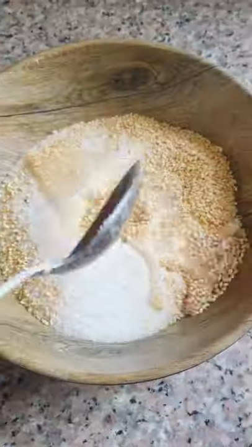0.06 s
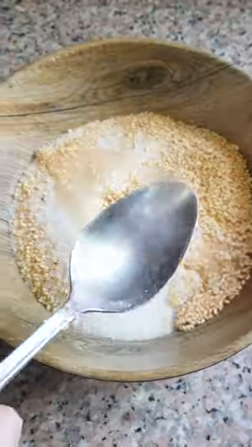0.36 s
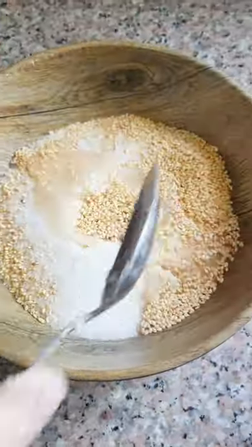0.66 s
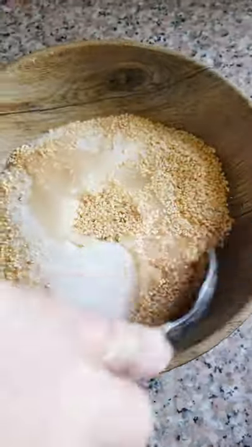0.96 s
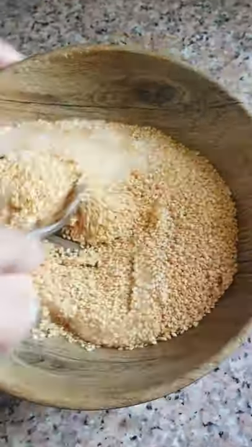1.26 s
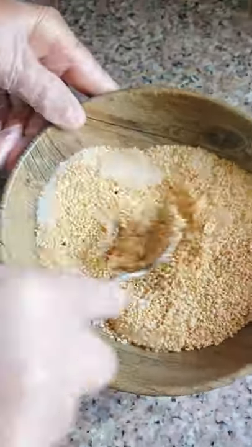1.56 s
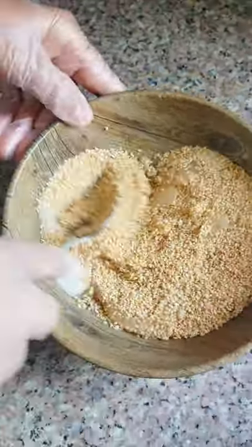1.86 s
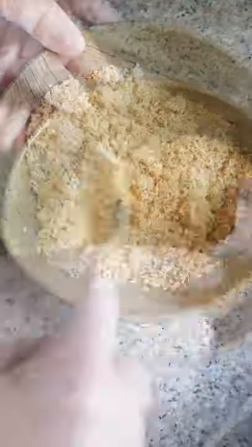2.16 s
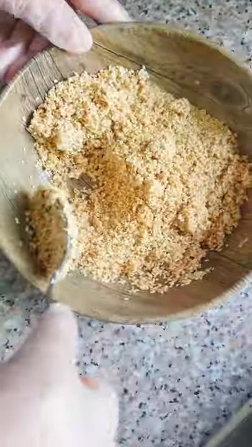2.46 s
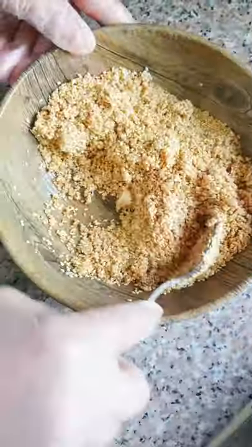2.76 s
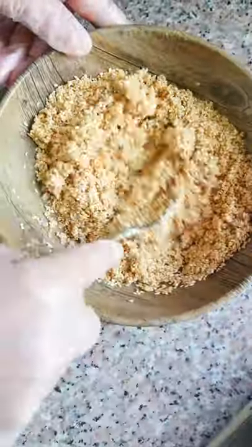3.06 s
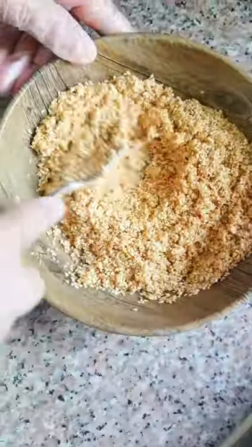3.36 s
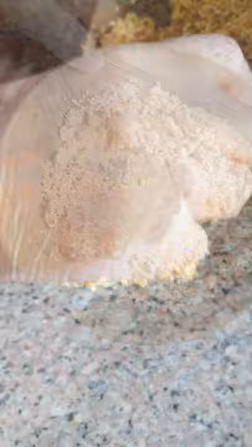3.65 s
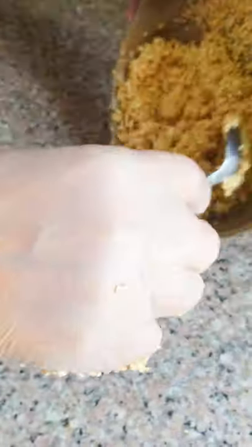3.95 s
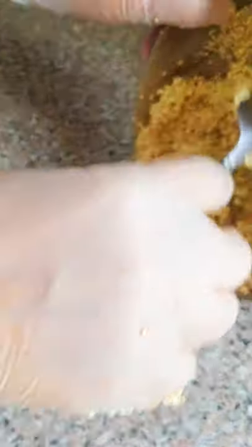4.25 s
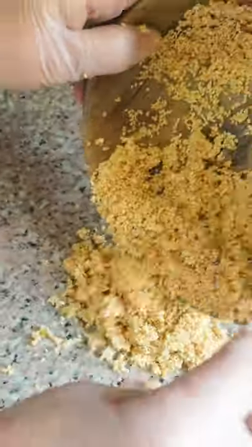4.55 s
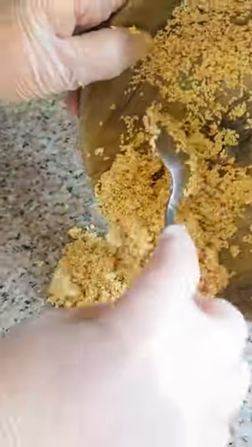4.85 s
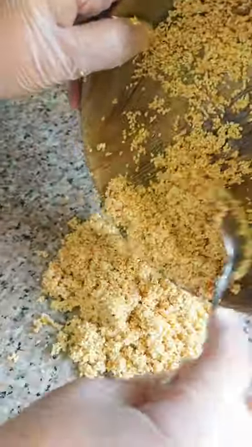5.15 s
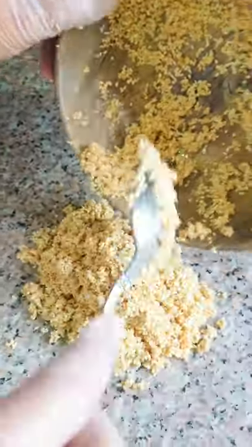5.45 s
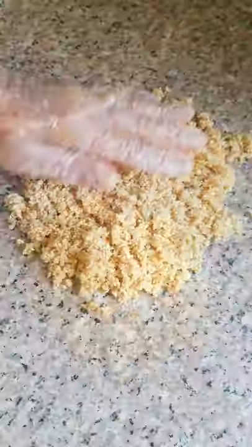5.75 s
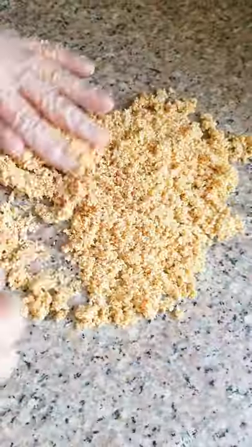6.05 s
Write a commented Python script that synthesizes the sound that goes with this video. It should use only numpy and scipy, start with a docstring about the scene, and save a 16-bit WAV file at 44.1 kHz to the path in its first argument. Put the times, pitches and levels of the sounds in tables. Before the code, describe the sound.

Moist sesame seeds rustle and crunch as a spoon mixes them and scrapes them out of a wooden bowl, clicking against it.

```python
"""Stirring sesame seeds in a wooden bowl

A metal spoon stirs moist seeds, then scrapes them out onto a stone countertop. Impacts and short,
gritty strokes of friction excite the modes of bowl and spoon; stick-slip oscillation adds squeaks.
The seeds, pushed and at last patted by hand, rustle through countless small collisions.
The small kitchen reverberates and hums faintly."""
import sys
import numpy as np
from scipy import signal
from scipy.fft import rfft, irfft
from scipy.io import wavfile
from scipy.ndimage import uniform_filter1d, map_coordinates

SR = 44100
rng = np.random.default_rng(int(sys.argv[2]) if len(sys.argv) > 2 else 0)


def master_out(mix):
    """Clip the mix to full scale and print it as 16-bit PCM to the path in sys.argv[1]."""
    frames = np.transpose(np.atleast_2d(mix))
    ceiling = np.clip(frames, -1, 1)
    pcm = np.round(ceiling * 32767).astype(np.int16)
    wavfile.write(sys.argv[1], SR, pcm)


N = 269010
TIME = np.arange(N) / SR

# noise spectra of room, rumble and seeds: (frequency [Hz], relative density [dB])
AIR_SPECTRUM = [(15, -54), (25, -10), (61, -7.5), (102, -7.5), (242, -22), (451, -12), (624, -20.5),
                (754, -20), (1400, -30.5), (2000, -32), (2410, -45), (2990, -41.5), (6920, -50),
                (14400, -42), (16000, -58)]
RUMBLE_SPECTRUM = [(60, -15.5), (120, 7), (200, 2.5), (400, -4), (700, -9), (1400, -30.5)]
RUSTLE_SPECTRUM = [(350, -26.5), (650, -4.5), (1100, -9), (1700, -5), (2200, -7.5), (3000, -5.5),
                   (4400, -2), (7000, -3.5), (12000, -5.5), (15000, -4.5), (16000, -7.5)]
# reverberation of the kitchen: (frequency [Hz], T60 [s], level [dB])
REVERB_BANDS = [(265, 0.22, 1), (1000, 0.34, -14), (2770, 0.28, -7), (6000, 0.21, -14), (14000, 0.094, -22)]
# reflections from bowl and counter: (nominal left delay [s], nominal right delay [s], level [dB])
REFLECTIONS = [(.00062, 0.00087, -8.5), (.00143, 0.0017, -2), (.0026, 0.0028, -3.5), (.0049, 0.0037, -10)]

# heaps of seeds pushed: (crest time [s], build-up [s], spill [s], level [dB], left minus right [dB])
PUSHES = [(.055, 0.048, .04, -61.5, 3.5), (.52, 0.052, 0.034, -55, 1), (0.715, 0.015, 0.028, -50.5, 1),
          (.88, .12, .08, -79, -2), (1.005, .012, .025, -58, 2.5), (1.16, 0.1, 0.037, -47, 3),
          (1.28, 0.11, 0.23, -43.5, 3.5), (1.59, 0.39, 0.036, -43, 4.5), (1.8, 0.036, .02, -41.5, 0.5),
          (1.98, 0.059, 0.035, -45.5, 2), (2.17, 0.066, 0.037, -48.5, 1.5), (2.39, 0.073, 0.055, -47.5, 1),
          (2.55, 0.033, 0.055, -56, 2.5), (2.651, 0.048, 0.024, -46.5, 4.5), (2.82, 0.027, 0.06, -60, 3),
          (2.94, .05, 0.065, -56, 4.5), (3.145, 0.042, 0.012, -45.5, 3), (3.333, 0.038, 0.014, -42.5, 2.5),
          (3.514, 0.04, 0.0097, -44.5, 2), (3.666, 0.027, .05, -50, 3.5), (3.972, 0.26, 0.071, -52, 3),
          (4.22, 0.044, 0.048, -45.5, 1.5), (4.52, 0.094, 0.026, -48, 4), (4.61, 0.024, 0.031, -61, 1.5),
          (4.815, 0.069, .015, -49, 3.5), (4.89, .04, 0.027, -64.5, -1), (5.05, 0.058, .018, -55.5, 1.5),
          (5.38, 0.23, .04, -58, 4), (5.761, .1, .05, -70.5, -1), (6.06, 0.082, 0.057, -60, -1)]
# stray seeds landing: (time [s], level [dB])
SEED_DROPS = [(0.286, -51), (4.401, -24), (4.980, -33), (5.623, -43.5), (5.945, -34.5)]

# modes: (frequency [Hz], nominal bandwidth [Hz], relative level [dB], left minus right [dB])
BODY_MODES = [(340, 160, -1, -2), (520, 260, 0, -1)]  # the bowl as a whole
STANDING_WALL_MODES = [(580, 81, 10, 1), (763, 240, 4.5, 0.91), (946, 190, 9, 9.1), (1190, 320, -7.5, 1.7)]  # its wall, standing on the counter
TILTED_WALL_MODES = [(588, 114, 2.5, 0), (910, 180, -1, -1.5), (1033, 150, -4, -2), (1273, 360, -7, 0.81)]  # its wall, held up
RIM_MODES = [(569, 130, 9.5, -2), (740, 160, -5, -6.5), (946, 420, 1, 4.5), (1375, 350, 5, -0.5)]  # struck clear of the seeds
STIRRING_SPOON_MODES = [(1843, 190, 2.5, 9), (2570, 530, 3, -3), (3010, 55, -3.5, -2), (3750, 470, -2, 13),
                        (5600, 140, -6.5, 16.5), (6300, 130, -9.5, 5.5)]
SCOOPING_SPOON_MODES = [(1440, 110, 6.5, -0.5), (1682, 410, 5.5, 2.5), (2412, 280, 6.5, -3.5),
                        (2817, 540, -12, -5.5), (4090, 270, 8, 0), (5190, 160, -31.5, 0)]
GRIT_MODES = [(5616, 2400, 9, 0.42), (6600, 600, 0, 0.14), (8100, 970, 4.5, 0), (11000, 9000, 2, 0.041),
              (14500, 10000, -11.5, 0.59)]  # seeds crushed under the edge

# squeaks of the spoon's edge: (start [s], duration [s], first pitch [Hz], last pitch [Hz],
# relative level [dB], second harmonic re fundamental [dB], pitch spread [fraction])
SQUEAKS = [(1.076, 0.024, 1265, 1377, -22.5, -30, 0.033), (1.113, 0.035, 4040, 4300, -28.5, -33, 0.06),
           (1.288, 0.036, 2420, 2454, -31, -28.5, 0.058), (1.309, 0.0073, 2726, 2300, -20, -33, 0.0075),
           (1.336, 0.021, 2870, 2600, -43, -9, 0.058), (1.516, 0.026, 2730, 3170, -28.5, 2.5, 0.11),
           (1.924, 0.035, 1008, 1218, -29, -19.5, 0.18), (2.117, 0.04, 2280, 3060, -39.5, -6.5, 0.045),
           (2.89, 0.04, 2525, 2943, -44, -2.5, 0.068), (3.715, 0.066, 1770, 1703, -49.5, -19.5, 0.018),
           (3.866, 0.025, 1033, 990, -36.5, -27.5, 0.022), (3.951, 0.041, 988, 900, -45.5, -26, 0.031),
           (4.166, 0.021, 1495, 2127, -28, -12.5, 0.028), (5.272, 0.069, 5220, 5550, -41.5, -15, 0.1176)]
# strokes of the spoon, with relative levels at peak pressure:
# (start [s], pressing [s], easing [s], pressure swell [dB], wood [dB], spoon [dB], grit [dB])
DRAGS = [(1.036, 0.031, 0.054, 4.5, -41, -34.5, -30.5), (1.123, .006, 0.036, 2, -38.5, -28.5, -33),
         (1.285, 0.058, 0.012, 13, -41, -24, -27), (1.458, 0.0075, .04, 10, -38, -30, -61),
         (1.503, 0.019, 0.027, 11.5, -47, -26, -28.5), (1.548, 0.011, .035, 2.5, -40, -44, -58),
         (1.737, 0.0058, 0.019, -1.5, -38.5, -56, -28), (1.922, 0.0078, 0.023, -4.5, -36.5, -55, -32.5),
         (1.968, 0.028, 0.011, 14, -52, -39.5, -36), (2.118, 0.012, 0.025, 7, -43.5, -42, -35.5),
         (2.315, 0.01, 0.074, 3.5, -35, -32.5, -28.5), (2.643, 0.0048, 0.016, 5, -58, -40.5, -38.5),
         (2.868, 0.045, 0.0096, 18, -46.5, -32.5, -30.5), (3.724, 0.091, 0.039, 20, -39, -35.5, -47),
         (3.862, 0.044, 0.049, 4.5, -42, -35, -41), (3.955, 0.023, 0.02, 9.5, -47.5, -49, -42),
         (4.121, 0.013, 0.021, 13.5, -39, -34, -42), (4.151, 0.04, 0.015, 12.5, -44.5, -28, -34.5),
         (4.446, 0.018, 0.04, 7.5, -30.5, -36.5, -30), (5.215, .1, 0.068, 19, -49, -42.5, -30),
         (5.385, .012, 0.011, 9, -51.5, -41.5, -34.5)]
# impacts of spoon on bowl, with relative levels:
# (time [s], crunch decay [s], body [dB], wood [dB], spoon [dB], grit [dB])
KNOCKS = [(0.437, 0.013, -41, -29.5, -34.5, -43.5), (0.475, 0.015, -43.5, -31.5, -40.5, -59),
          (0.616, 0.025, -48.5, -48, -57, -65), (1.063, 0.0033, -52, -44, -39, -31),
          (1.271, 0.0037, -42, -27.5, -23, -34.5), (1.32, 0.0026, -41, -40, -28, -40.5),
          (1.454, 0.0026, -48.5, -34.5, -27, -48.5), (1.472, 0.0027, -48, -34, -30.5, -48.5),
          (1.493, 0.0009, -42, -27, -33.5, -45.5), (1.739, 0.0048, -52, -38.5, -43.5, -28.5),
          (1.926, 0.018, -62, -39, -43, -33), (2.1, 0.0099, -53, -42, -68, -38.5),
          (2.528, 0.016, -46.5, -50.5, -59, -48.5), (2.875, 0.011, -53.5, -35.5, -38.5, -55),
          (3.626, 0.0065, -38.5, -45, -53, -49.5), (3.861, 0.0017, -46, -48, -44, -47.5),
          (4.126, 0.0042, -38.5, -24.5, -16, -31), (4.413, 0.0019, -34, -24, -36.5, -38.5),
          (4.454, 0.0013, -34, -47.5, -48, -36.5), (4.471, 0.0017, -31.5, -28, -38, -59),
          (4.678, 0.014, -52, -55, -57.5, -55.5), (4.777, 0.006, -49.5, -40.5, -45, -42.5),
          (4.959, 0.0049, -43.5, -49.5, -55, -47.5), (5.191, 0.0046, -49.5, -49, -33, -38.5),
          (5.357, 0.0093, -54, -69, -40.5, -30)]


def from_db(db):
    """Amplitude grows tenfold for every 20 dB."""
    return 10 ** (np.asarray(db) / 20)


def unit_rms(x):
    """Normalisation to unit mean power."""
    return x / np.sqrt(np.mean(x ** 2) + 1e-20)


def at_hz(points, hz, column=1):
    """Interpolation of a spectrum on a logarithmic frequency axis."""
    points = np.array(points)
    return np.interp(np.log(hz + 1e-9), np.log(points[:, 0]), points[:, column])


def drift(knots_per_s):
    """Smooth random modulation with a spread near 1."""
    knots = rng.standard_normal(N // 8)
    return map_coordinates(knots, [TIME * knots_per_s], order=2, mode="wrap")


def coloured(x, spectrum):
    """Spectral shaping of noise, at unit rms."""
    gain = from_db(at_hz(spectrum, np.fft.rfftfreq(N, 1 / SR)))
    return unit_rms(irfft(rfft(x) * gain, N))


def stereo_noise(correlation, length=N):
    """Partial coherence: the sum and difference of two independent noises feed left and right."""
    mid, side = rng.standard_normal((2, length))
    side = side * np.array([[1], [-1]])
    return (np.sqrt(1 + correlation) * mid + np.sqrt(1 - correlation) * side) / np.sqrt(2)


def grains(per_s, spread_db, correlation):
    """Shot noise: a Poisson train of clicks of uneven size, at unit rms."""
    occurs = rng.random(N) < per_s / SR
    sizes = from_db(spread_db * np.minimum(rng.exponential(1, N), 4))
    return unit_rms(stereo_noise(correlation) * occurs * sizes)


def resonate(drive, modes, max_q=20):
    """Modal superposition at unit mean power gain; damping by moist seeds and fingers limits the Q."""
    impulse, response = np.eye(1, 2048)[0], 0
    for hz, width_hz, level_db, pan_db in modes:
        radius = np.exp(-np.pi * max(width_hz, hz / max_q) / SR)
        poles = [1, -2 * radius * np.cos(2 * np.pi * hz / SR), radius ** 2]
        gains = from_db(level_db + np.array([[.5], [-.5]]) * pan_db)
        response = response + gains * (1 - radius ** 2) * signal.lfilter([1, 0, -1], poles, impulse)
    edges_hz = [modes[0][0] * .7, min(modes[-1][0] * 1.4, SR * .45)]
    response = signal.sosfilt(signal.butter(2, edges_hz, "band", fs=SR, output="sos"), response)
    return signal.oaconvolve(drive, np.sqrt(2) * response / np.linalg.norm(response), axes=1)[:, :N]


def late_right(pair, lag_s):
    """A path difference delays the right channel."""
    return np.array([pair[0], np.roll(pair[1], round(lag_s * SR))])


def background(flow):
    """Incoherent sources add in power: room noise, rumble of room and handled bowl, an appliance's hum."""
    air = from_db(-64) * coloured(stereo_noise(correlation=0.33), AIR_SPECTRUM)
    effort = np.abs(uniform_filter1d(flow, int(.25 * SR)))
    handling = from_db(-59.5) * (effort / effort.max()) ** 0.38
    rumble_level = np.hypot(from_db(-68.5), handling)
    rumble = rumble_level * coloured(stereo_noise(correlation=1.0), RUMBLE_SPECTRUM)
    motor_phase = 2 * np.pi * 90.8 * TIME + 0.66 * drift(32)
    motor = unit_rms(np.sin(motor_phase) * from_db(1.8 * drift(12)))
    return air + rumble + from_db(-66.5) * motor


def kitchen_reverb(sound):
    """The diffuse field between hard walls decays exponentially, soonest in the high treble."""
    t, response = TIME[:SR // 2], 0
    onset = 1 - np.exp(-t / 0.00043)
    for low_hz in 125 * 2. ** np.arange(8):
        centre_hz = low_hz * np.sqrt(2)
        decay = from_db(-60 * t / at_hz(REVERB_BANDS, centre_hz))
        tail = rng.standard_normal((2, len(t))) * decay * onset
        tail *= from_db(at_hz(REVERB_BANDS, centre_hz, column=2)) / np.linalg.norm(tail[0])
        octave = signal.butter(2, [low_hz, min(2 * low_hz, SR * .45)], "band", fs=SR, output="sos")
        response = response + signal.sosfilt(octave, tail)
    return signal.oaconvolve(sound, response, axes=1)[:, :N]


def close_reflections(pair, path_sway=.3):
    """Comb filtering: direct sound interferes with reflections whose paths vary as spoon and bowl move."""
    total, power = pair, 1
    for *delays_s, level_db in REFLECTIONS:
        stretch = np.exp(path_sway * drift(1.5))
        echo = [np.interp(TIME - delay * stretch, TIME, side) for delay, side in zip(delays_s, pair)]
        total = total + from_db(level_db) * np.array(echo)
        power += from_db(level_db) ** 2
    return total / np.sqrt(power)


def at_contact(pair):
    """Time and level differences locate the contact with the seeds, which moves from push to push."""
    crest_s, *_, pans_db = np.transpose(PUSHES)
    pan_db = np.interp(TIME, crest_s, pans_db)
    return late_right(pair, lag_s=.00042) * from_db([pan_db / 2, -pan_db / 2])


def seed_flow(trickle_db=-29, trickle_s=.1):
    """Envelope of granular flow: heaps gather, spill and trickle to rest, adding in power."""
    t, power = TIME[::20], 0
    for crest, build_s, spill_s, level_db, _ in PUSHES:
        from_crest = np.maximum((crest - t) / build_s, (t - crest) / spill_s)
        heap = np.exp(-from_crest ** 1.4)  # between a cusp and a bell
        trickle = from_db(trickle_db) * (t > crest) * np.exp(-np.abs(t - crest) / trickle_s)
        power = power + (from_db(level_db) * (heap + trickle)) ** 2
    return np.interp(TIME, t, np.sqrt(power))


def seed_rustle(flow, dry_until_s=1.025, dry_db_per_octave=5.5):
    """Collisions of seeds merge into noise, brighter at first while only dry grains move."""
    ticks = grains(per_s=14000, spread_db=3.0, correlation=0.69)
    dry_spectrum = [(hz, db + dry_db_per_octave * np.log2(hz)) for hz, db in RUSTLE_SPECTRUM]
    dry_ticks, moist_ticks = coloured(ticks, dry_spectrum), coloured(ticks, RUSTLE_SPECTRUM)
    return flow * np.where(TIME < dry_until_s, dry_ticks, moist_ticks)


def seed_drops():
    """Each falling seed delivers one impulse, heard as a tiny bright tick."""
    clicks = np.zeros((2, N))
    for time_s, level_db in SEED_DROPS:
        clicks[:, round(time_s * SR)] = from_db(level_db)
    return resonate(clicks, GRIT_MODES)


def squeaks(flutter_db=4.5):
    """Stick-slip oscillation gives a brief, unsteady tone that glides as the contact point moves."""
    sound, waver, flutter = np.zeros(N), drift(900), from_db(flutter_db * drift(350))
    for start, length, first_hz, last_hz, level_db, overtone_db, spread in SQUEAKS:
        span = slice(round(start * SR), round((start + length) * SR))
        progress = np.linspace(0, 1, span.stop - span.start)
        hz = (first_hz + (last_hz - first_hz) * progress) * (1 + spread * waver[span])
        phase = 2 * np.pi * np.cumsum(hz) / SR
        tone = np.sin(phase) + from_db(overtone_db) * np.sin(2 * phase)
        envelope = np.sin(np.pi * progress) * unit_rms(flutter[span])
        sound[span] += from_db(level_db) * np.sqrt(2) * envelope * tone
    return late_right([sound * from_db(3.5), sound * from_db(-.8)], lag_s=.00036)


def drag_envelopes(attack_s=0.0026, release_s=0.0018, ease_db=12):
    """Friction noise follows a power law of pressure, which swells until the spoon bites, then eases."""
    exponents = (0.77, 0.95, 1.3)  # wood, spoon, grit
    envelopes = np.zeros((3, N))
    for start, press_s, ease_s, swell_db, *parts_db in DRAGS:
        bite, end = start + press_s, start + press_s + ease_s
        near = (TIME > start - 10 * attack_s) & (TIME < end + 10 * release_s)
        t = TIME[near]
        pressure_db = np.interp(t, [start, bite, end], [-swell_db, 0, -ease_db])
        contact = np.exp(np.minimum(t - start, 0) / attack_s - np.maximum(t - end, 0) / release_s)
        pressure_gain = from_db(np.outer(exponents, pressure_db))
        envelopes[:, near] += from_db(parts_db)[:, None] * pressure_gain * contact
    return envelopes


def knock_forces(crunch_ratio=1.3, rise_s=.0007):
    """An impact is one impulse within a burst of crushed seeds; it drives body, wood, spoon and grit."""
    lead = SR // 80
    forces, t = np.zeros((4, 2, N)), np.arange(-lead, SR // 20) / SR
    for time_s, decay_s, *levels_db in KNOCKS:
        envelope = np.exp(np.minimum(t / rise_s, -t / decay_s))
        burst = stereo_noise(correlation=0.35, length=len(t)) * envelope
        burst *= crunch_ratio / np.linalg.norm(burst[0])
        burst[:, lead] += 1  # the sharp contact
        burst *= np.sqrt(SR / 100 / (1 + crunch_ratio ** 2))  # energy of 10 ms at unit rms
        first = round(time_s * SR) - lead
        forces[:, :, first:first + len(t)] += from_db(levels_db)[:, None, None] * burst
    return forces


def spoon_on_bowl(stir_from_s=0.9, stir_until_s=3.58):
    """Forced vibration: impacts and surging trains of frictional slips ring bowl, spoon and grit."""
    wood_drag, spoon_drag, grit_drag = drag_envelopes()
    surge = unit_rms(from_db(0.76 * drift(300)))
    slips = surge * grains(per_s=3800, spread_db=1.0, correlation=0.35)
    crushing = surge * grains(per_s=7000, spread_db=4.0, correlation=0.35)
    on_body, on_wood, on_spoon, on_grit = from_db(-1.0) * knock_forces()
    on_spoon = on_spoon + from_db(-1.56) * spoon_drag * slips
    rubbing = from_db(2.0) * wood_drag * slips
    # the spoon is sunk in the seeds while stirring; afterwards the bowl is tilted and scooped out
    sunk = (TIME > stir_from_s) & (TIME < stir_until_s)
    wood = (resonate(on_body + from_db(-13.5) * rubbing, BODY_MODES)
            + resonate((on_wood + rubbing) * sunk, STANDING_WALL_MODES)
            + resonate(rubbing * ~sunk, TILTED_WALL_MODES)
            + resonate(on_wood * ~sunk, RIM_MODES))
    metal = (resonate(on_spoon * sunk, STIRRING_SPOON_MODES)
             + resonate(on_spoon * ~sunk, SCOOPING_SPOON_MODES))
    grit = resonate(on_grit + from_db(-2.5) * grit_drag * crushing, GRIT_MODES)
    grit = at_contact(close_reflections(grit))
    return late_right(wood, lag_s=.0003) + late_right(metal, lag_s=.00036) + grit


def scene():
    """Superposition of the nearby bowl's direct sound, its reverberation and the background."""
    flow = seed_flow()
    seeds = at_contact(close_reflections(seed_rustle(flow) + seed_drops()))
    direct = spoon_on_bowl() + squeaks() + seeds
    return direct + kitchen_reverb(direct) + background(flow)


def record(dry, cutoff_hz=15900):
    """Band limiting: an elliptic low-pass filter cuts the top steeply."""
    return signal.sosfilt(signal.ellip(10, .1, 80, cutoff_hz, fs=SR, output="sos"), dry)


dry = scene()
out = record(dry)
master_out(out)
```